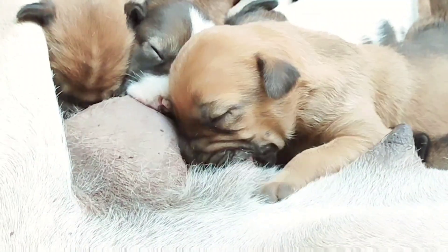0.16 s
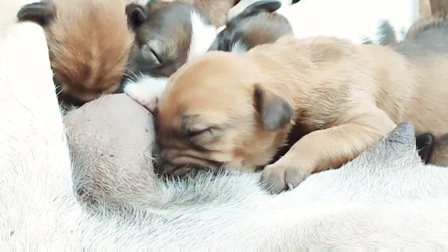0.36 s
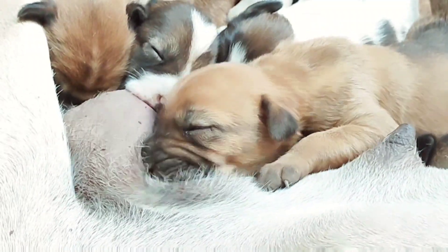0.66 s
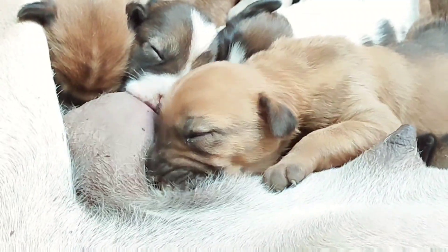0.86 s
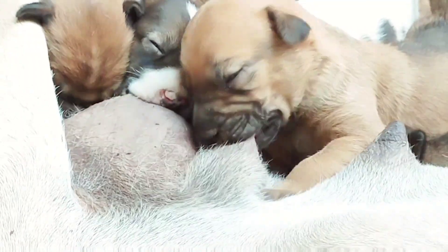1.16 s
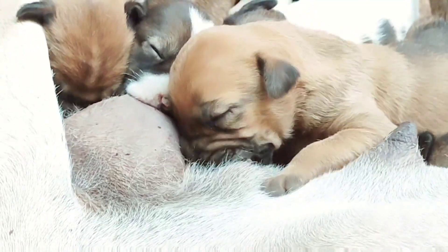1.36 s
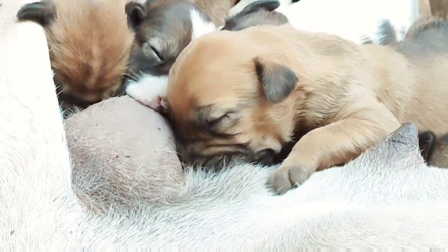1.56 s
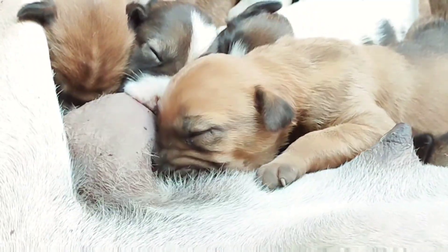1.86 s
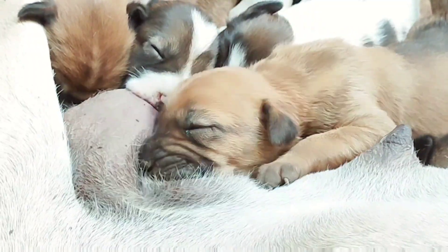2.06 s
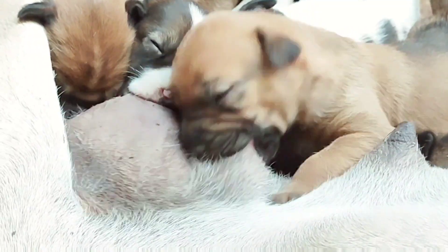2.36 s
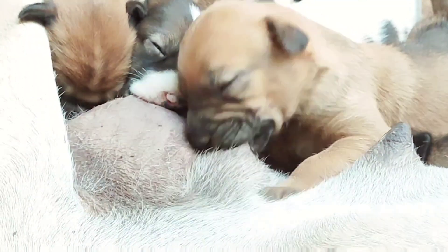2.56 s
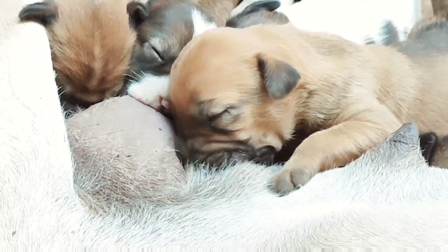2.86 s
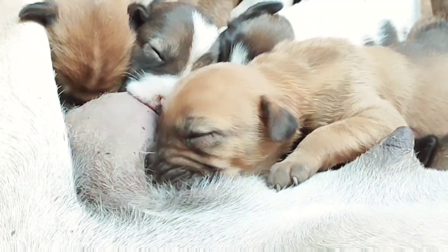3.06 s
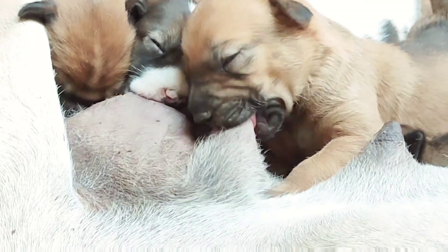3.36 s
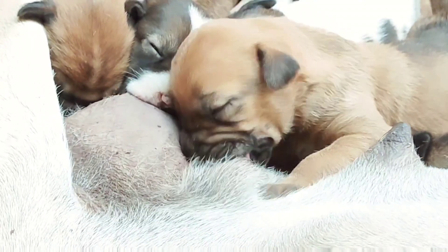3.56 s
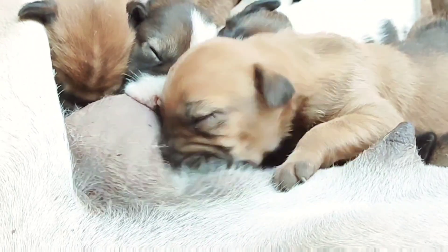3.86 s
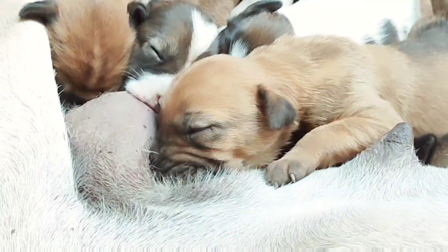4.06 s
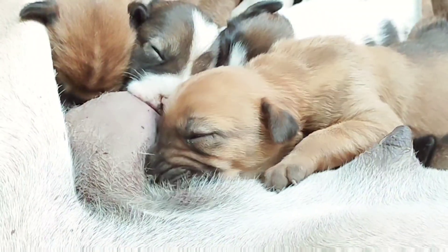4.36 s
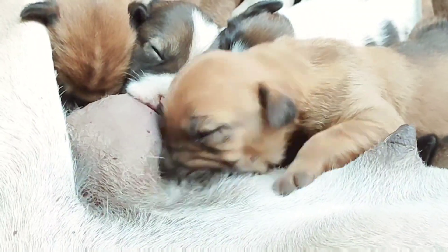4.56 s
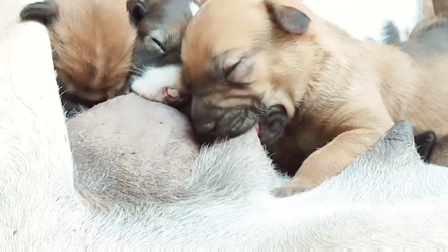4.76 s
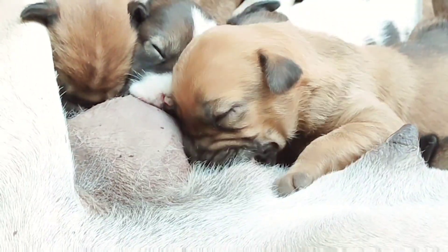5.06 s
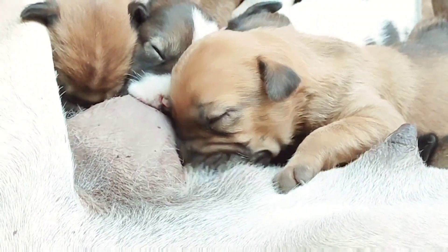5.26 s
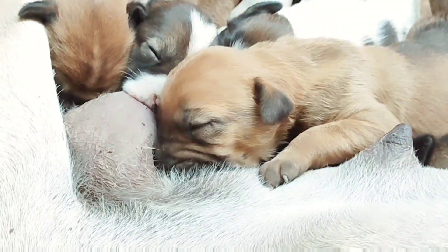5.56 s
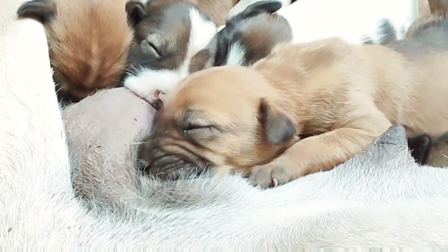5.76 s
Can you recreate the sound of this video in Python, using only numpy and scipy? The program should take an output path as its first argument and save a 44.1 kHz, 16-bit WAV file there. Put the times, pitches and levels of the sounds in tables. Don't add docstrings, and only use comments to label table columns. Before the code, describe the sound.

Dense, piercing cicada chorus with one near singer alternating ring and rasp; barely audible suckling puppies whimper and nudge underneath.

```python
import sys
import numpy as np
from scipy import signal
from scipy.fft import rfft, irfft
from scipy.io import wavfile
from scipy.ndimage import uniform_filter1d

SR = 44100
rng = np.random.default_rng(int(sys.argv[2]) if len(sys.argv) > 2 else 0)


def field_ratio(decibels):
    return 10 ** (np.asarray(decibels, dtype=float) / 20)


def dump(signal):
    limited = np.clip(np.atleast_2d(signal).T, -1, 1)
    pcm = np.round(limited * 32767).astype(np.int16)
    wavfile.write(sys.argv[1], SR, pcm)


N = 261072
TIME = np.arange(N) / SR

# (time [s], cycles done [count])
PUMPING = [
    (-0.209, 0),
    (1.209, 8),
    (1.544, 10),
    (2.259, 14),
    (2.601, 16),
    (6.16, 36),
]


def evened(x):
    return x / np.sqrt(np.mean(x ** 2) + 1e-20)


def coloured(x, points):
    point_hz, point_db = np.transpose(points)
    hz = np.fft.rfftfreq(len(x), 1 / SR)
    gain_db = np.interp(np.log(hz + 1), np.log(point_hz + 1), point_db, -150, -150)
    return evened(irfft(rfft(x) * field_ratio(gain_db), len(x)))


def resonate(x, hz, width):
    off = (np.fft.rfftfreq(len(x), 1 / SR) - hz) / width
    return evened(irfft(rfft(x) / (1 + 1j * off) ** 3, len(x)))


def wander(rate_hz):
    knots = rng.standard_normal(2048)
    return evened(np.interp(TIME * 2 * rate_hz, np.arange(len(knots)), knots))


def humps(rows):
    power = np.zeros(N)
    for s, db, length in rows:
        near = slice(max(int((s - 2 * length) * SR), 0), int((s + 2 * length) * SR))
        bell = np.exp(-4 * np.log(2) * ((TIME[near] - s) / length) ** 2)
        power[near] += field_ratio(db) ** 2 * bell
    return np.sqrt(power)


def buckling(clicks_hz, jitter, smear_s):
    pace = np.clip(1 + jitter * wander(90), 0.2, 3)
    clicks = np.cumsum(clicks_hz * pace) / SR
    age_s = (clicks % 1) / clicks_hz
    return evened(np.exp(-age_s / smear_s) * rng.standard_normal(N))


def near_singer(waver_hz=13, flutter_db=2.5):
    # (pitch at entry [Hz], at exit [Hz], middle of ringing [cycle], length [cycle])
    ring = [(3370, 3352, .6, .9), (3630, 3638, .4, .5), (3600, 3594, .76, .36), (3866, 3874, .55, .78),
            (4355, 4435, .46, .62), (4572, 4572, .7, .9), (4960, 4965, .82, .4), (5305, 5310, .9, .7),
            (5670, 5670, .8, .6)]
    ring_db = [-33, -27.5, -27, -30.5, -35, -48, -50, -45, -49]
    # (centre [Hz], width [Hz], level [dB])
    ring_body = [(3563, 312, -28), (4080, 270, -32)]
    # (centre [Hz], width [Hz], level [dB])
    rasp_body = [(5117, 145, -35), (6800, 300, -44.5), (7740, 190, -50), (8350, 420, -55.5)]
    cycle = np.interp(TIME, *np.transpose(PUMPING)) % 1
    clicks = buckling(257, jitter=0.079, smear_s=0.0025)
    out = np.zeros(N)
    for (enter_hz, exit_hz, middle, length), db in zip(ring, ring_db):
        from_middle = (cycle - middle + 0.5) % 1 - 0.5
        place = np.clip(from_middle / length + 0.5, 0, 1)
        hz = enter_hz + (exit_hz - enter_hz) * place + waver_hz * wander(25)
        strength = np.sqrt(2 * np.sin(np.pi * place)) * field_ratio(db + flutter_db * wander(14))
        out += strength * np.sin(2 * np.pi * np.cumsum(hz) / SR)
    ringing = np.clip(0.75 - 0.95 * np.cos(2 * np.pi * (cycle + 0.03)), 0, 1)
    for hz, width, db in ring_body:
        out += ringing * field_ratio(db) * resonate(clicks, hz, width)
    for hz, width, db in rasp_body:
        out += (1 - ringing) * field_ratio(db) * resonate(clicks, hz, width)
    return out


def chorus(throb_db=0.94, patch_db=0.91):
    # (frequency [Hz], level [dB per Hz])
    sacs = [(940, -77), (1040, -51), (1100, -20.5), (1330, -19), (1430, -9), (1590, -8), (1680, -2),
            (1790, 7.5), (1870, 5), (2050, -6.5), (2210, -13.5), (2400, -34), (3000, -61)]
    # (frequency [Hz], level [dB per Hz])
    ribs = [(1900, -65), (2200, -45.5), (2470, -34), (2730, -19), (3260, -5), (3400, -0.5), (3700, -1),
            (4000, -5.5), (4750, -11), (5480, -8), (6500, -19), (7780, -29.5), (9100, -42.5), (9500, -68)]
    crowd = np.zeros(N)
    for pace, start, rate in rng.random((10, 3)):
        throb = np.cos(2 * np.pi * ((5.0 + 1.37 * pace) * TIME + start))
        crowd += field_ratio(throb_db * throb) * buckling(220 + 80 * rate, jitter=0.2, smear_s=0.0036)
    _, _, z = signal.stft(crowd, SR, nperseg=512)
    patches = uniform_filter1d(rng.standard_normal(z.shape), size=3, axis=0)
    patches = evened(uniform_filter1d(patches, size=14, axis=1))
    crowd = signal.istft(z * field_ratio(patch_db * patches), SR, nperseg=512)[1][:N]
    return field_ratio(-44.5) * coloured(crowd, sacs) + field_ratio(-21.0) * coloured(crowd, ribs)


def sac_strands(strand_db=-58, roam_hz=30):
    out = np.zeros(N)
    for middle_hz in (1760, 1810, 1860):
        strength = field_ratio(strand_db + 5.4 * wander(14))
        hz = middle_hz + roam_hz * wander(6)
        out += strength * np.sin(2 * np.pi * np.cumsum(hz) / SR)
    return out


def swells(rasp_db=-41.5, rasp_s=0.08, throb_s=0.056, uneven_db=1.3):
    # (first swell [s], pace [swells per s])
    throbs = [
        (.055, 6.04),
        (.07, 5.02),
        (.146, 5.26),
    ]
    throbs_db = [-41.5, -46, -48]
    s, cycles = np.transpose(PUMPING)
    rasp_times = np.interp(np.arange(1, cycles[-1]), cycles, s)
    rows = [(at, rasp_db, rasp_s) for at in rasp_times]
    for (first, pace), db in zip(throbs, throbs_db):
        rows += [(at, db, throb_s) for at in np.arange(first, TIME[-1], 1 / pace)]
    return humps(rows) * field_ratio(uneven_db * wander(6))


def buzzers():
    # (frequency [Hz], level [dB per Hz])
    buzz = [(9000, -45), (9300, -30), (9600, -21), (10700, -17), (11200, -19.5), (12100, -13.5),
            (12800, -9), (14900, -6.5), (15500, -11)]
    # (frequency [Hz], level [dB per Hz])
    swell_body = [(9500, -38), (11200, -29), (12100, -13.5), (12800, -11), (14900, -6), (15500, -0.5)]
    steady = coloured(rng.standard_normal(N), buzz)
    swelling = coloured(buckling(250, jitter=0.15, smear_s=0.007), swell_body)
    return field_ratio(-45.9 + 0.7 * wander(7)) * steady + field_ratio(-2.0) * swells() * swelling


def puppies():
    # (time [s], peak [dB], length [s])
    whimpers = [(0.054, -57, 0.094), (0.345, -69.5, 0.1), (0.546, -60.5, 0.03), (0.807, -63, 0.092),
                (1.052, -61.5, 0.046), (1.256, -57, 0.04), (1.379, -60, 0.03), (1.896, -60, 0.12),
                (2.163, -57.5, 0.074), (2.349, -63, 0.14), (2.712, -64.5, 0.19), (2.814, -75, 0.036),
                (3.082, -65, 0.048), (3.501, -64.5, 0.15), (4.46, -65.5, 0.097), (4.796, -61.5, 0.12),
                (5.007, -70, 0.051), (5.549, -67, 0.077)]
    # (time [s], peak [dB], length [s], pitch [Hz])
    bumps = [(0.406, -78, 0.064, 120), (1.197, -63, 0.032, 146.7), (1.375, -71, .06, 201.6),
             (2.268, -71, .04, 112), (2.397, -66, 0.056, 329), (2.578, -60, 0.049, 141),
             (2.845, -63, 0.077, 155), (3.11, -72, 0.071, 154.6), (3.714, -70, 0.041, 150),
             (4.305, -65.5, 0.064, 152), (4.562, -70.5, 0.055, 121), (4.73, -70, .08, 115),
             (5.329, -74, .06, 101), (5.887, -66, 0.044, 150)]
    # (frequency [Hz], level [dB per Hz])
    thud = [(30, -30), (60, -3), (110, 0), (220, -4), (400, -16), (700, -40)]
    breath = rng.standard_normal(N)
    nose = field_ratio(-4.5) * (resonate(breath, 1199, 37) + resonate(breath, 1185, 88))
    out = humps(whimpers) * nose
    sway = 1 + 0.1255 * wander(70)
    for s, db, length, hz in bumps:
        tone = np.sin(2 * np.pi * hz * np.cumsum(sway) / SR)
        out += np.sqrt(2) * humps([(s, db, length)]) * tone
    thuds = humps([(s, db, 0.7 * length) for s, db, length, hz in bumps])
    return out + field_ratio(-4.5) * thuds * coloured(breath, thud)


def air():
    # (frequency [Hz], level [dB per Hz])
    rumble = [(15, -14), (25, -9), (50, -2), (120, 5), (165, 2), (232, 1), (400, -5), (550, -10.5),
              (900, -7.5), (970, -14), (1050, -40)]
    return field_ratio(-72.0 + 0.73 * wander(3.9)) * coloured(rng.standard_normal(N), rumble)


def scene():
    cicadas = near_singer() + chorus() + sac_strands() + buzzers()
    return (cicadas + puppies() + air())[None]


def gate(x):
    # (frequency [Hz], level [dB])
    shut = [(700, -14), (880, -6), (990, 1), (1080, -2), (1350, -3), (1450, -14), (8800, -9), (9150, -1.2),
            (9400, -1), (9700, -2.5), (10100, -2), (11300, -3), (12000, -14)]
    hz, _, z = signal.stft(x, SR, nperseg=2048, noverlap=1536)
    power = uniform_filter1d(abs(z) ** 2, size=2, axis=1)
    power = uniform_filter1d(power, size=5, axis=0)
    wide = uniform_filter1d(power, size=14, axis=0)
    power = np.where(hz[:, None] > 5000, wide, power)
    limit = np.median(power, axis=1) * field_ratio(np.interp(hz, *np.transpose(shut))) ** 2
    gain = np.where(power < limit[:, None], field_ratio(-35), 1)
    return signal.istft(z * gain, SR, nperseg=2048, noverlap=1536)[1][:N]


def top_cut(x):
    return signal.sosfilt(signal.butter(12, 16460, fs=SR, output="sos"), x)


def record(dry, limit_db=-18.5, squeeze=0.46):
    bell = signal.windows.gaussian(161, 22)
    bell = bell / bell.sum()
    power_db = 10 * np.log10(signal.oaconvolve(dry[0] ** 2, bell, "same") + 1e-12)
    over_db = signal.oaconvolve(np.maximum(power_db - limit_db, 0), bell, "same")
    fade_in = np.minimum((np.arange(N) + 3) / 12, 1)
    limited = dry * field_ratio(-squeeze * over_db) * fade_in
    treble_cut = signal.firwin(801, 15540, window=("kaiser", 9), fs=SR)
    mix = signal.oaconvolve(gate(limited[0])[None], treble_cut[None], "same")
    return top_cut(mix)


dry = scene()
out = record(dry)
dump(out)
```